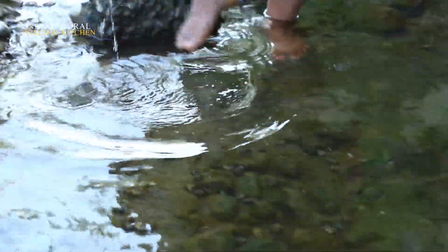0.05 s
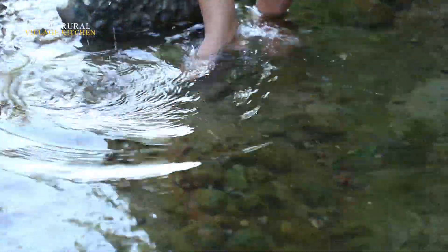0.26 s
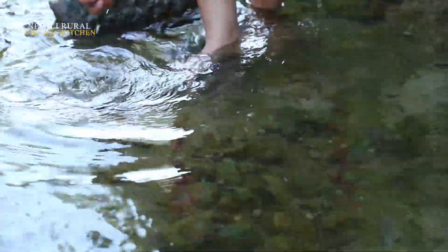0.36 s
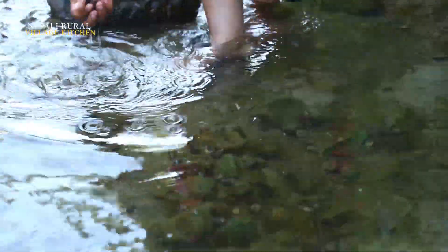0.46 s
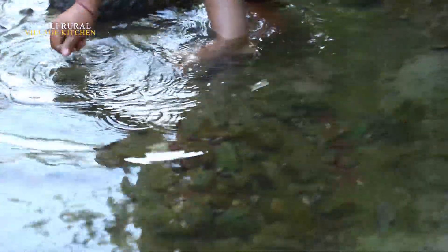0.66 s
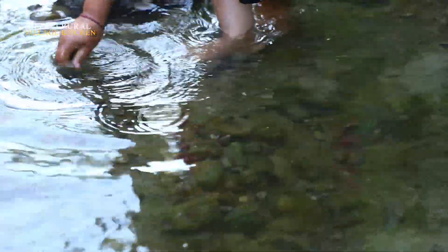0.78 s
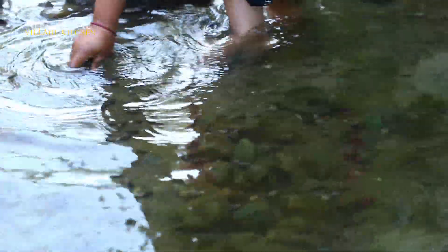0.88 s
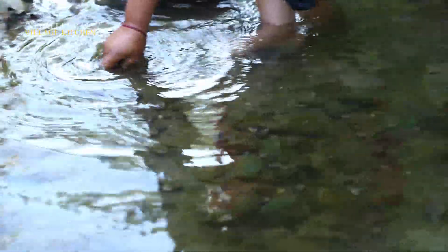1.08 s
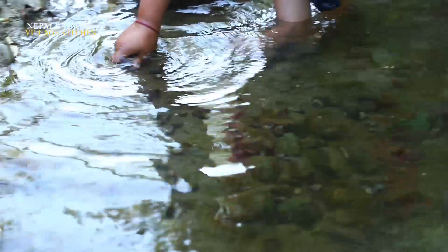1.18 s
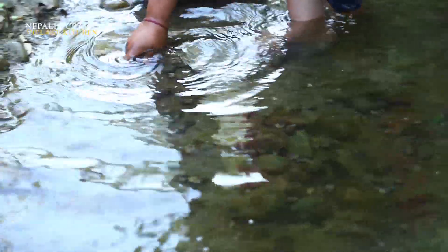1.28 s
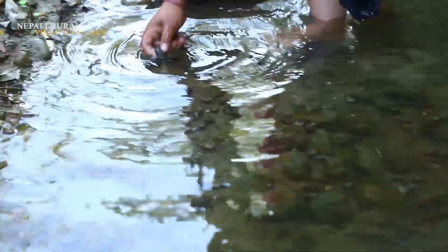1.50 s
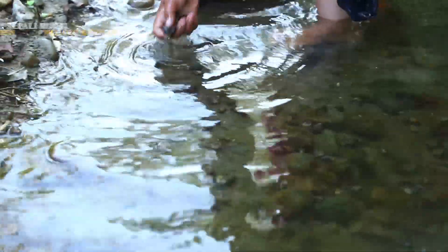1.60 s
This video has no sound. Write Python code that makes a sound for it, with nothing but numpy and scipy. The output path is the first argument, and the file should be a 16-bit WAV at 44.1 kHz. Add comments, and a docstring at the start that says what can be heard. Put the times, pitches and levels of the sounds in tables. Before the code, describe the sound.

A quick, close splash of a foot entering shallow water is followed by bubbly plops, scattered drips and a lighter dip of a hand. Underneath, the stream murmurs quietly, insects shimmer and small birds trill far off.

```python
"""Foot and hand in a shallow stream.

A bare foot steps in and a hand dips in after it. The water slaps shut, trapped air
rings as bubbles and thrown drops patter back. Behind it the stream murmurs, insects
shimmer, and small birds trill, buzz and whistle far off."""
import sys
import numpy as np
from scipy import signal
from scipy.fft import rfft, irfft
from scipy.io import wavfile

SR = 44100
rng = np.random.default_rng(int(sys.argv[2]) if len(sys.argv) > 2 else 0)


def log_audio(samples):
    """Write samples as a 16-bit WAV file to the path given in sys.argv[1]."""
    # one column per channel
    frames = np.atleast_2d(samples).T
    # limit to full scale, then quantise
    limited = np.clip(frames, -1, 1)
    pcm = np.round(limited * 32767).astype(np.int16)
    wavfile.write(sys.argv[1], SR, pcm)


N = 72765
T = np.arange(N) / SR


def from_db(db):
    """Decibels to gain."""
    return 10 ** (np.asarray(db) / 20)


def unit_rms(x):
    """Scale to unit rms."""
    return x / np.sqrt(np.mean(x ** 2) + 1e-20)


def at_hz(points, hz):
    """Interpolate (Hz, value) rows on a log-frequency axis."""
    points_hz, values = np.array(points).T
    return np.interp(np.log(hz), np.log(points_hz), values)


def panned(x, pan_db):
    """Mono to stereo, left louder by pan_db."""
    return x * from_db([[pan_db / 2], [-pan_db / 2]])


def butter(x, hz, kind, order=2):
    """Causal Butterworth filter."""
    return signal.sosfilt(signal.butter(order, hz, kind, fs=SR, output="sos"), x + 1e-18)


def resonate(x, hz, width_hz, stages=1):
    """Identical resonators in series, each of peak gain 1."""
    r = np.exp(-np.pi * width_hz / SR)
    b = np.array([1, 0, -1]) * (1 - r * r) / 2
    a = [1, -(1 + r * r) * np.cos(2 * np.pi * hz / SR), r * r]
    for _ in range(stages):
        x = signal.lfilter(b, a, x + 1e-18)
    return x


def decay(start_s, t60_s):
    """Step to 1, then exponential decay."""
    return (T >= start_s) * np.exp(-np.log(1000) * np.maximum(T - start_s, 0) / t60_s)


def scatter(x, t60_s, delay_s=0):
    """Diffuse reflections: a unit-energy noise tail for each ear."""
    tail = rng.standard_normal((2, N)) * decay(delay_s, t60_s)
    tail /= np.sqrt(np.sum(tail ** 2, axis=1, keepdims=True))
    return signal.fftconvolve(np.atleast_2d(x), tail, axes=1)[:, :N]


def stream(level_db=-58):
    """Even murmur of running water, most alike between the ears in the bass."""
    # Each row: frequency in Hz, relative spectral density in dB.
    spectrum = [(30, 10), (90, -4), (250, -1), (550, -4), (800, -6.5), (1300, -6), (1650, -4), (2000, -9),
                (3500, -9.5), (5600, -9.5), (6500, -9.5), (7500, -8.5), (8500, -5.5), (9300, -6),
                (9900, -18), (12500, -22.5), (15800, -28.5)]
    # Each row: frequency in Hz, left-right correlation.
    correlation = [(100, 0.66), (200, 0.1), (640, 0.4), (1400, 0.24), (3100, 0.12), (7000, 0.033),
                   (15000, 0.061)]
    hz = np.maximum(np.fft.rfftfreq(N, 1 / SR), 1)
    mid, side = rfft(rng.standard_normal((2, N)))
    alike = at_hz(correlation, hz)
    ears = np.sqrt(1 + alike) * mid + np.sqrt(1 - alike) * side * [[1], [-1]]
    murmur = irfft(from_db(at_hz(spectrum, hz)) * ears, N)
    return from_db(level_db) * unit_rms(butter(murmur, 38, "high"))


def insects(hz=7140, width_hz=450, level_db=-63.5):
    """Thin, steady shimmer of narrow-band noise."""
    return from_db(level_db) * unit_rms(resonate(rng.standard_normal((2, N)), hz, width_hz, stages=2))


def drone():
    """Low rumble in two narrow bands, left of centre."""
    # Each row: centre in Hz, nominal width in Hz, level in dB.
    bands = [(38, 16, -70.5), (68.9, 18, -73)]
    out = np.zeros(N)
    for hz, width_hz, db in bands:
        settled = resonate(rng.standard_normal(2 * N), hz, 2 * width_hz, stages=2)[N:]
        out += from_db(db) * unit_rms(settled)
    return panned(out, pan_db=5.5)


def chirp(middle_s, length_s, hz, fall_hz):
    """Falling sine under a smooth window of height 1."""
    t = np.clip(T - middle_s, -length_s / 2, length_s / 2)
    cycles = hz * t - fall_hz * t * t / (2 * length_s)
    return np.cos(np.pi * t / length_s) ** 2 * np.sin(2 * np.pi * cycles)


def trills(runs, period_s, chirp_s, hz, fall_hz):
    """Fast, even runs of falling chirps that swell."""
    out = np.zeros(N)
    for first_s, last_s, first_db, last_db in runs:
        count = round((last_s - first_s) / period_s) + 1
        for k, db in enumerate(np.linspace(first_db, last_db, count)):
            middle_s = first_s + period_s * (k + rng.normal(0, 0.0067))
            gain = from_db(db + rng.normal(0, 0.53))
            out += gain * chirp(middle_s, chirp_s, hz + rng.normal(0, 50), fall_hz)
    return out


def buzzes(centre_hz=4530, swing_hz=202, rate_hz=110, wander_hz=170, fade_s=0.038):
    """A whistle warbled so fast and unevenly that it buzzes in a narrow band."""
    # Each row: start in seconds, end in seconds, level in dB.
    notes = [(0.689, 0.886, -59.5), (0.918, 1.094, -58.5), (1.14, 1.308, -58)]
    envelope = sum(from_db(db) * np.clip(np.minimum(T - start_s, end_s - T) / fade_s, 0, 1)
                   for start_s, end_s, db in notes)
    wander, flutter = unit_rms(butter(rng.standard_normal((2, N)), 390, "low"))
    hz = centre_hz + swing_hz * np.sin(2 * np.pi * rate_hz * T) + wander_hz * wander
    warble = (1 + 0.3 * flutter) * np.sin(2 * np.pi * np.cumsum(hz) / SR)
    return envelope * unit_rms(butter(warble, [4250, 4850], "band"))


def birds(wet_db=-10):
    """Trills, buzzes and thin whistles, blurred by the trees."""
    # Each row: first and last chirp time in seconds, first and last chirp peak in dB.
    high_runs = [(.7665, .907, -55, -51.5), (1.074, 1.326, -55.5, -49), (1.502, 1.656, -56.5, -52)]
    low_runs = [(1.526, 1.562, -66, -58), (1.58, 1.652, -52.5, -51.5)]
    # Each row: middle in seconds, pitch in Hz, peak in dB.
    whistles = [(0.021, 7010, -55.5), (0.144, 7100, -60), (.183, 6850, -58), (0.293, 7000, -66),
                (0.334, 7060, -54.5), (0.46, 7000, -58), (.5, 7020, -58), (.61, 7100, -59),
                (.775, 7000, -64), (0.814, 6900, -57.5), (.932, 7050, -61), (0.969, 6960, -64),
                (1.396, 7320, -56.5), (1.545, 7050, -75)]
    song = trills(high_runs, period_s=0.014, chirp_s=0.0077, hz=6310, fall_hz=1100)
    song += trills(low_runs, period_s=0.018, chirp_s=0.014, hz=4600, fall_hz=700)
    song += buzzes()
    for middle_s, hz, db in whistles:
        song += from_db(db) * chirp(middle_s, length_s=0.057, hz=hz, fall_hz=113)
    return song + from_db(wet_db) * scatter(song, t60_s=0.12)


def near_reflections(x, gain_db=-5.5, spread_db=3):
    """Scatter from legs, rocks and water close by; the ears differ mainly in the treble."""
    mid, side = scatter(x.mean(axis=0), t60_s=0.055, delay_s=0.0011)
    treble_side = from_db(spread_db) * butter(side, 1600, "high", order=1)
    return from_db(gain_db) * (mid + treble_side * [[1], [-1]])


def far_reflections(x, gain_db=-16):
    """Faint, later treble tail."""
    return from_db(gain_db) * butter(scatter(x, t60_s=0.35, delay_s=0.015), 2200, "high")


def swishes():
    """Soft swells of water pushed aside by leg and hand."""
    # Each row: middle in seconds, 1/e half-length in seconds, centre in Hz, stage width in Hz,
    # top level in dB.
    swells = [(0.23, 0.17, 406, 530, -64.5), (.49, .06, 474, 350, -64.5), (.48, .12, 3000, 2200, -64),
              (0.767, 0.13, 2580, 1400, -63)]
    out = np.zeros(N)
    for middle_s, half_s, hz, width_hz, db in swells:
        churn = unit_rms(resonate(rng.standard_normal(N), hz, width_hz, stages=2))
        out += from_db(db) * np.exp(-((T - middle_s) / half_s) ** 2) * churn
    return out


def spray(drops_per_s=700, t60_cycles=15, pitches=24, spread_db=4):
    """Tiny droplets and bubbles of random size and pitch, fading after each disturbance."""
    # Each row: start in seconds, level in dB, t60 in seconds.
    bursts = [(0.206, -37.5, 0.07), (.222, -39, 0.033), (0.242, -51, 0.51), (0.482, -63, 0.58),
              (0.88, -52, 0.21), (.953, -59.5, 0.6)]
    envelope = sum(from_db(db) * decay(start_s, t60_s) for start_s, db, t60_s in bursts)
    sizes = from_db(spread_db * np.minimum(rng.exponential(1, N), 4)) * rng.choice([-1, 1], N)
    drops = unit_rms(sizes * (rng.random(N) < drops_per_s / SR)) * envelope
    pitch_index = rng.integers(0, pitches, N)
    out = np.zeros((2, N))
    for k, hz in enumerate(np.geomspace(1600, 7600, pitches)):
        width_hz = np.log(1000) / np.pi * hz / t60_cycles
        makeup_gain = np.sqrt(SR / (np.pi * width_hz))
        pings = makeup_gain * resonate(drops * (pitch_index == k), hz, width_hz)
        out += panned(pings, rng.normal(0, 2))
    return out


def bubbles(attack_s=0.0003):
    """Trapped air rings as decaying sines; most rise in pitch as they near the surface."""
    # Each row: start in seconds, pitch in Hz, level in dB, t60 in seconds,
    # glide as a share of pitch per second, left minus right in dB.
    rings = [(0.2032, 956, -41, 0.026, -8, 4), (0.208, 1508, -35.5, 0.031, 5.5, 3),
             (0.222, 2960, -30.5, 0.016, 5, -4), (0.2203, 4570, -29, 0.036, -3, 10),
             (0.222, 3470, -36, .035, -3.5, 14), (.2232, 6550, -28.5, 0.017, 1, -2),
             (.2370, 2456, -42, .035, 9, -12), (0.2545, 3370, -38.5, 0.023, -6, 2),
             (0.2778, 1947, -31.5, 0.042, 1.5, -4.5), (.2815, 3520, -42, 0.023, 24, 6),
             (.2932, 670, -42, 0.033, -1, 3), (0.296, 1240, -43, 0.021, 2, 2),
             (.3085, 958, -53, 0.12, 0, -1), (0.312, 3516, -37, 0.03, -1.5, 6.5),
             (.3590, 4850, -39, 0.011, 20, -6), (0.3711, 484, -44.5, 0.057, 8, 2),
             (0.3736, 900, -36.5, 0.01, 8, 3), (0.3718, 3900, -52.5, 0.032, 3.5, 16),
             (.3850, 1097, -33.5, 0.074, -1.5, -2), (0.384, 1340, -29.5, 0.017, -10, -0.5),
             (.3865, 548, -39.5, 0.098, 26, 3), (0.405, 4020, -44, 0.037, -7.5, -1),
             (0.42, 3960, -47, .025, 3, 7), (0.4873, 4116, -32, 0.02, 4.5, 1),
             (0.4932, 4200, -35.5, 0.019, -4, 1), (0.5575, 3340, -42, 0.018, 17, 4),
             (0.586, 5140, -48, 0.024, 7, 0), (.6275, 6270, -36.5, 0.011, 4, -3),
             (0.6868, 1532, -38.5, 0.074, -0.8, 0.5), (0.9171, 2250, -44.5, 0.032, 14, -4),
             (0.9964, 935, -47.5, 0.019, 8, 3), (1.0215, 1490, -47.5, 0.04, 3.5, -3),
             (1.0925, 758, -51, 0.036, 0, 0), (1.135, 628, -53, 0.04, 5, 3)]
    out = np.zeros((2, N))
    for start_s, hz, db, t60_s, glide_per_s, pan_db in rings:
        age_s = np.maximum(T - start_s, 0)
        tone = np.sin(2 * np.pi * hz * (age_s + glide_per_s * age_s ** 2 / 2))
        envelope = decay(start_s, t60_s) * (1 - np.exp(-age_s / attack_s))
        out += panned(from_db(db) * tone * envelope, pan_db)
    return out


def cavity(x, hz, width_hz, skirt_share=0.46):
    """Pocket of air and water under an impact: a steep resonance with broad skirts."""
    broad = resonate(x, hz, 1.64 * width_hz)
    steep = resonate(broad, hz, 1.3 * width_hz)
    return skirt_share * broad + (1 - skirt_share) * steep


def slaps(spurt_db=6.5):
    """Surface impacts: each a crack and a short, uneven splatter through one cavity."""
    # Each row: start in seconds, crack gain in dB, splatter gain in dB, centre in Hz,
    # nominal width in Hz, splatter t60 in seconds.
    impacts = [(0.1438, -60, -49, 5500, 4000, 0.012), (0.2065, -19.5, -32, 2870, 4540, 0.015),
               (0.2215, -13.5, -25.5, 4750, 3170, 0.016), (0.2784, -34, -48, 3960, 4000, 0.017),
               (0.3171, -38, -49, 6040, 1200, 0.057), (0.359, -45, -44.5, 4880, 1200, .018),
               (.3849, -30, -41.5, 2000, 3080, 0.032), (.4034, -35, -53.5, 3950, 2500, 0.034),
               (.4860, -30, -42.5, 3980, 1500, 0.01), (0.4909, -31.5, -53, 3970, 1800, 0.024),
               (0.5081, -29, -45, 4600, 2200, .009), (0.5401, -37.5, -43, 3450, 2180, 0.033),
               (0.558, -35, -46, 4460, 1780, 0.016), (0.6031, -40, -49, 4100, 3500, 0.023),
               (.6129, -53, -49, 4280, 1200, 0.032), (.6275, -33.5, -45, 6200, 1400, 0.014),
               (0.6874, -35, -45.5, 4500, 2010, 0.015), (0.888, -44, -51, 4040, 1600, .022),
               (.9514, -43, -39.5, 7600, 1200, .009), (0.954, -53, -46, 3540, 2000, 0.027),
               (0.9759, -28, -54.5, 2370, 1100, 0.023), (0.9764, -38.5, -40, 5300, 700, 0.02)]
    flicker = unit_rms(butter(rng.standard_normal(N), 900, "low"))
    spurts = from_db(spurt_db * np.clip(flicker, -2, 2))
    out = np.zeros(N)
    for start_s, crack_db, splatter_db, hz, width_hz, t60_s in impacts:
        crack = cavity(signal.unit_impulse(N, int(start_s * SR)), hz, width_hz)
        crack /= np.abs(crack).max()
        splatter = unit_rms(cavity(rng.standard_normal(N) * spurts, hz, width_hz))
        out += from_db(crack_db) * crack + from_db(splatter_db) * splatter * decay(start_s, t60_s)
    return butter(butter(out, 950, "high"), 9800, "low", order=3)


def scene(bubble_send_db=-8):
    """Splash and reflections over the stream and wildlife; bubbles stay mostly dry."""
    splashes = slaps() + spray()
    rings = bubbles()
    send = splashes + from_db(bubble_send_db) * rings
    reflections = near_reflections(send) + far_reflections(send)
    water = splashes + rings + swishes() + reflections
    return water + stream() + insects() + drone() + birds()


def record(dry, cutoff_hz=15800):
    """Steep elliptic low-pass."""
    return signal.sosfilt(signal.ellip(10, 0.1, 80, cutoff_hz, fs=SR, output="sos"), dry)


dry = scene()
out = record(dry)
log_audio(out)
```